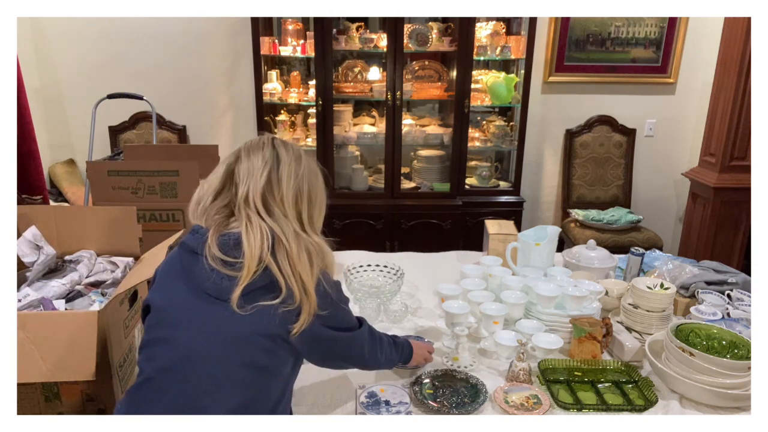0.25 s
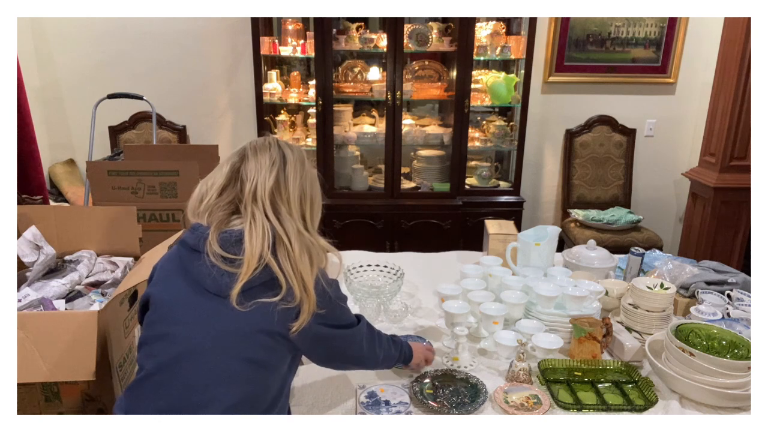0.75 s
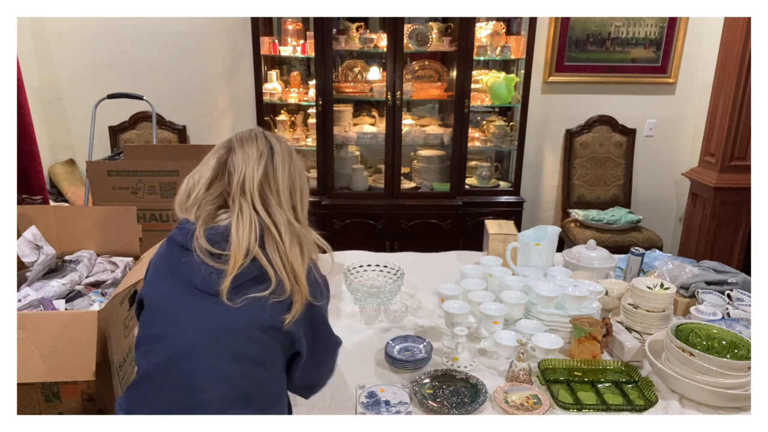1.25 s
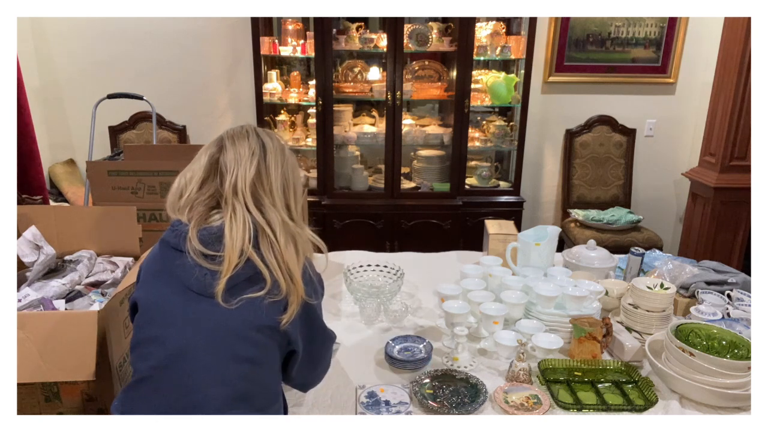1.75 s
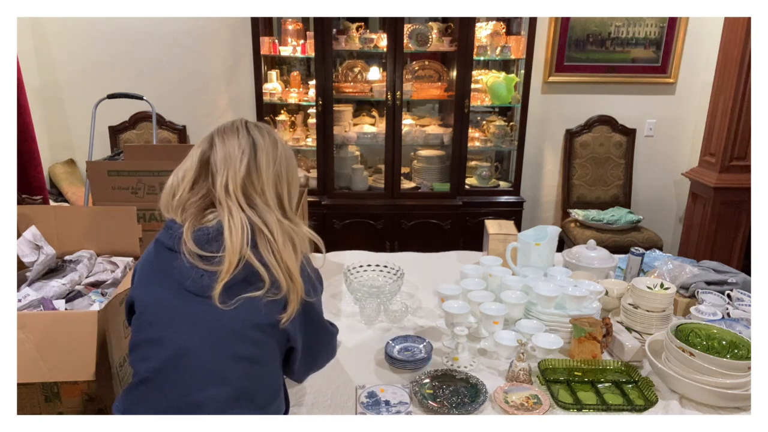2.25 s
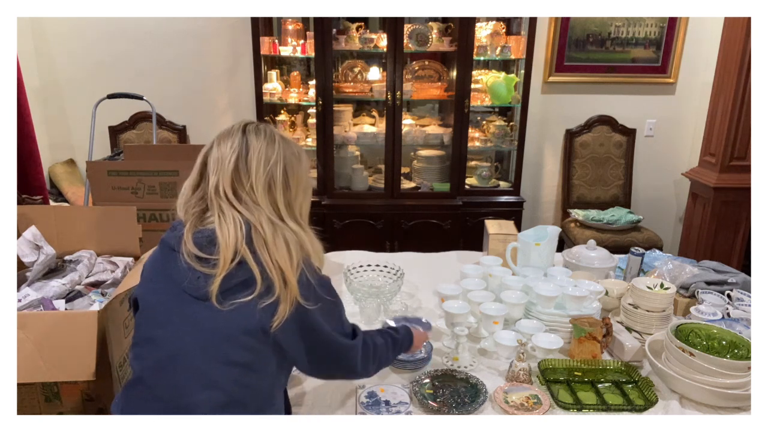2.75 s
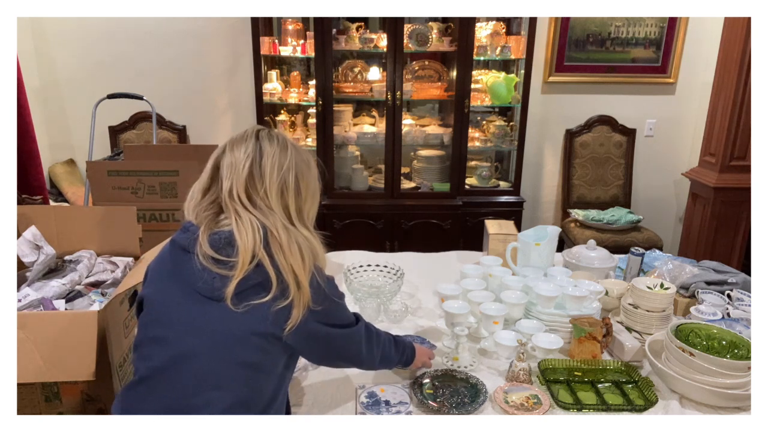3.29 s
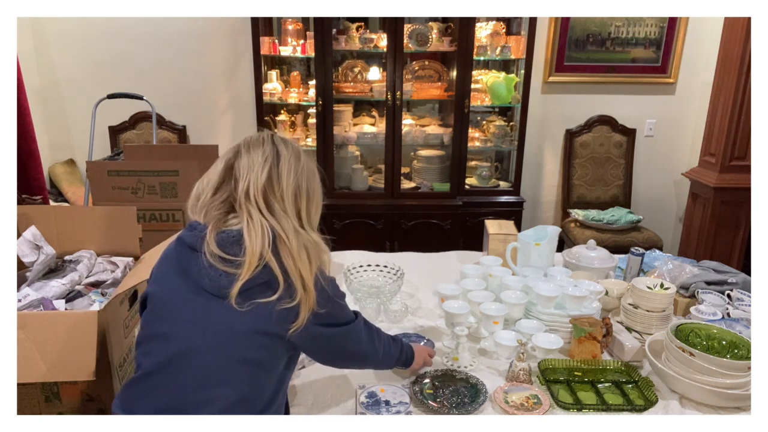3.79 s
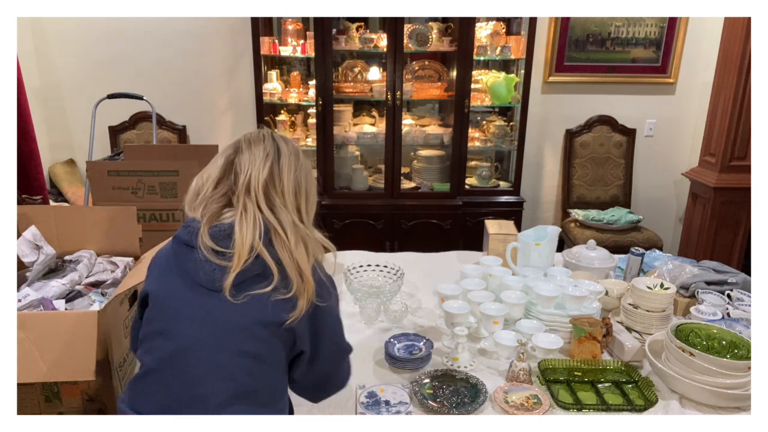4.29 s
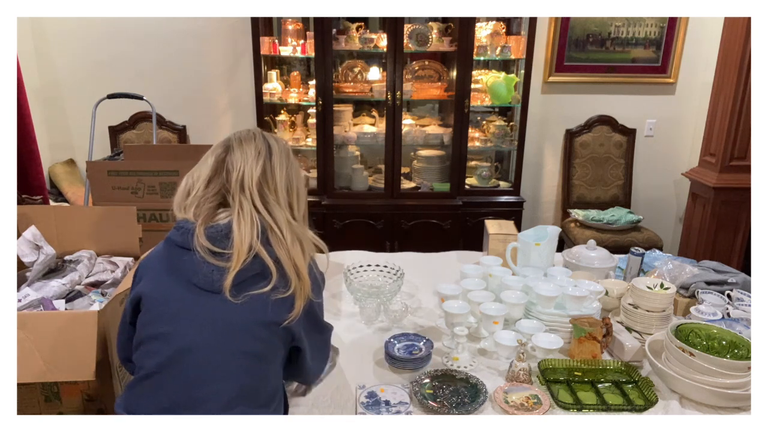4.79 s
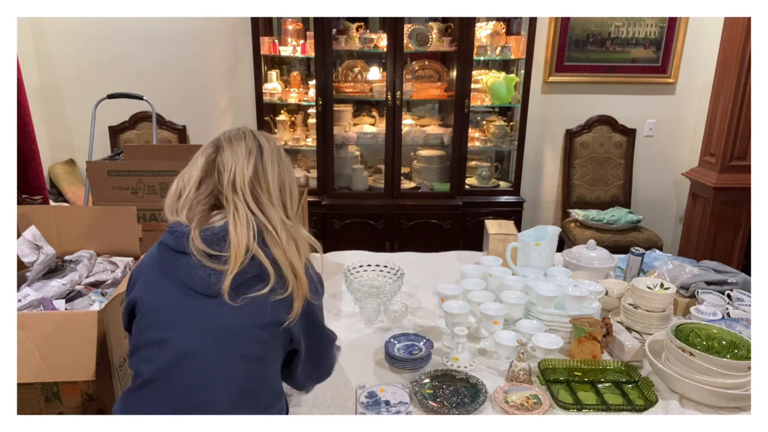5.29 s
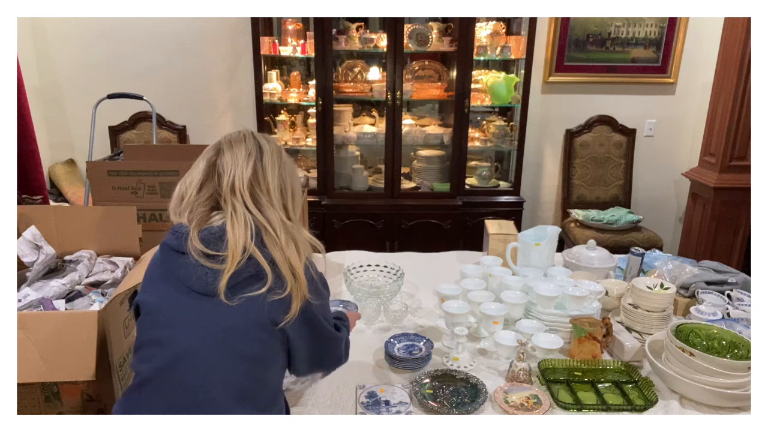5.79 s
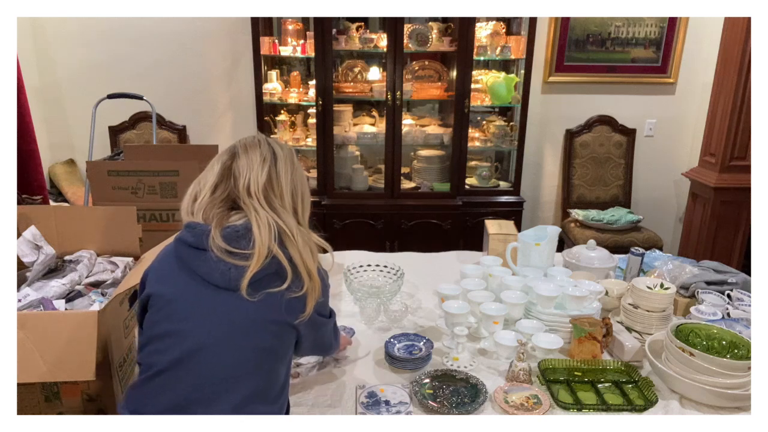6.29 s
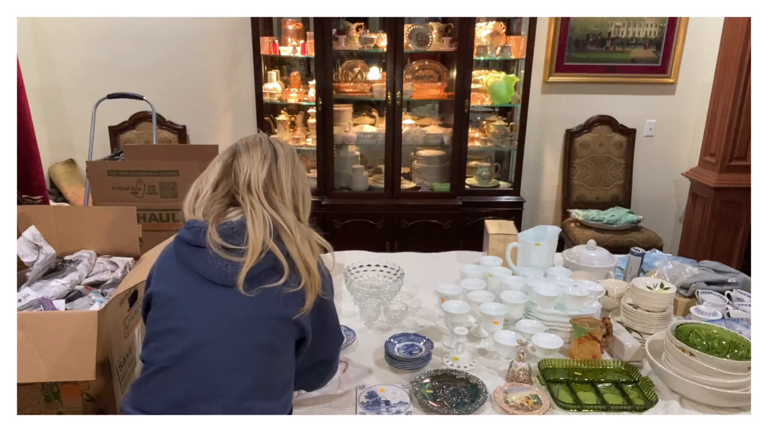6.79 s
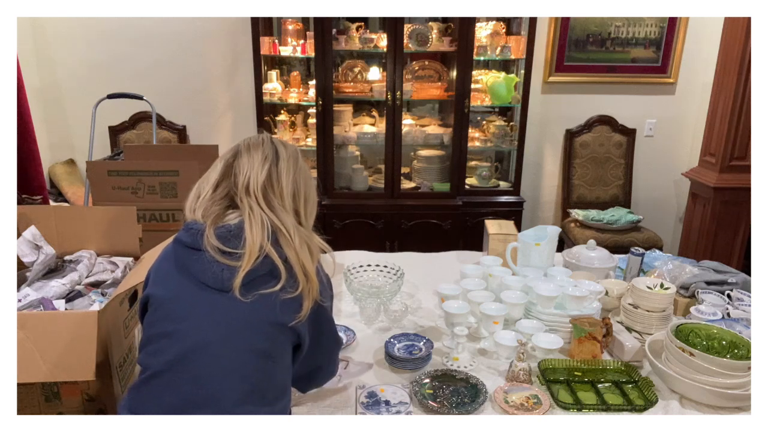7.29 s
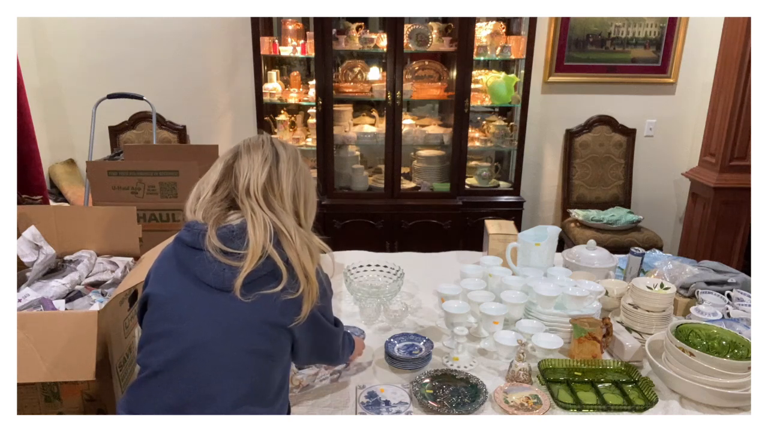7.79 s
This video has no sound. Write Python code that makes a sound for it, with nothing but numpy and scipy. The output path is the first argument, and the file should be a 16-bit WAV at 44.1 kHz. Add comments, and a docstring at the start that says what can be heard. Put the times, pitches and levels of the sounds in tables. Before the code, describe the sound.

A bright, close clatter of china bowls being set into one another opens the scene, followed by dry newspaper crumpling with small snapping folds. The paper quietens, a few softer clinks nudge the stack, then more unwrapping rustle continues. A soft floor thud passes beneath, and bowls knock and drag at the end. Furnished indoor room, stereo microphone a short distance away, faint low rumble and room tone.

```python
"""At a table in a furnished room, newspaper is pulled off china bowls, which knock and chatter as they are stacked.
The paper is a random train of crease clicks shaped by band and handful; sharper folds snap with a brief ring.
The bowls are damped modes struck by blows or fed by dense ticks. A low rumble of resonant noise, perhaps from
outside, fades unevenly; one footfall sounds on the floorboards, over steady room tone that dips once."""
import sys
import numpy as np
from scipy import signal
from scipy.fft import rfft, irfft, next_fast_len
from scipy.io import wavfile
from scipy.ndimage import uniform_filter1d

SR = 44100
rng = np.random.default_rng(int(sys.argv[2]) if len(sys.argv) > 2 else 0)


def unload_audio(sound):
    """Save the sound as a 16-bit wav file, at the path given as the first command line argument."""
    columns = np.transpose(np.atleast_2d(sound))
    # keep every value between -1 and 1, then stretch to whole-number steps
    steps = np.round(np.clip(columns, -1, 1) * 32767)
    wavfile.write(sys.argv[1], SR, steps.astype(np.int16))


N = 355004

# Handfuls of paper crumpled or pulled: (start [s], length [s], relative rustle level [dB],
# treble against it [dB], low thrum against it [dB])
HANDFULS = [(-0.05, 0.078, -55, -9.5, -3), (0.033, 0.44, -42, -11, -9.5), (0.483, 0.059, -44.5, -8, 2.5),
            (0.578, 0.093, -49.5, -2.5, -3), (0.638, 0.18, -44.5, -7, -4), (0.808, 0.055, -36, -6, -0.5),
            (0.92, 0.041, -37.5, -15, -2), (0.96, 0.12, -48.5, 1, -11), (1.142, 0.17, -38, -5.5, -3.5),
            (1.298, 0.31, -44.5, -5.5, -3), (1.5, 0.21, -44, -7, -4), (1.657, 0.04, -46.5, 3.5, 4.5),
            (1.793, 0.23, -53.5, -6, -4.5), (2.022, .06, -52.5, -2, -0.5), (2.191, 0.032, -49.5, -6, -5),
            (2.286, 0.045, -66, -8, -7), (2.483, 0.077, -65, -8, -10), (2.555, 0.052, -65.5, 3.5, -5),
            (2.715, 0.15, -55, -6.5, -1), (2.796, 0.16, -53.5, -6.5, -17), (2.936, 0.14, -48, -4, -5.5),
            (3.065, 0.42, -51, -3.5, -0.5), (3.406, 0.23, -49.5, -7.5, -4), (3.59, 0.1, -46, -8.5, -2.5),
            (3.815, 0.17, -47, -7.5, -3.5), (3.983, 0.091, -48.5, -8, 0), (4.027, 0.21, -47.5, -5.5, -2.5),
            (4.197, 0.12, -40.5, -1.5, -3), (4.255, 0.3, -42.5, -5, -5.5), (4.558, 0.2, -42.5, -4, -4),
            (4.866, 0.39, -50.5, -10, -4.5), (4.938, 0.31, -47.5, -5.5, -4), (5.295, 0.13, -47.5, -4.5, -5),
            (5.478, 0.13, -48, -3.5, -2), (5.595, 0.15, -47, -7.5, -4.5), (5.749, 0.17, -42.5, -2.5, -8.5),
            (5.963, 0.14, -44.5, -10, -4), (6.126, 0.16, -46.5, -2.5, -4.5), (6.3, 0.18, -50.5, -5.5, -3),
            (6.504, 0.09, -47.5, -9, -7), (6.614, 0.19, -43.5, -5, -3.5), (6.756, 0.23, -53, -4, -34),
            (6.92, 0.32, -47.5, -5.5, -4), (7.365, 0.29, -50.5, -8.5, -2.5),
            (7.572, 0.12, -47.5, -4.5, -0.5), (7.65, 0.2, -48, 0.5, -11), (7.8, 0.42, -57, -7, 3)]
# Spectrum of the crease noise: (frequency [Hz], relative level [dB])
PAPER_COLOUR = [(100, -46), (200, -12.5), (500, -3), (900, 15.5), (2200, 12), (4500, 4.5), (8000, 0.5),
                (10000, -5), (12500, -8.5), (15500, -8.5)]
# Modes of the cardboard under the paper: (frequency [Hz], relative level [dB], t60 [s])
PAPER_BOX = [(295, -29, 0.31), (429.3, 15, 0.031), (503, 13, 0.044), (920, -11, 0.12), (1270, 1.5, 0.011)]
GRIP_S, GRIP_SHARE, LET_GO_T60_S = 0.035, 0.13, 0.16   # rise is GRIP_S plus a share of the handful's length
BOX_SWING_DB = 3.5   # standard deviation of each box mode's slow level change


def paper():
    """Crackling noise: creases let go in clumps, and the same impulses excite the box by resonance."""
    start, length, level_db, treble_db, low_db = np.transpose(HANDFULS)
    handfuls = zip(start, length, GRIP_S + GRIP_SHARE * length)
    power = np.array([swell(s, held, rise, LET_GO_T60_S) ** 2 for s, held, rise in handfuls])
    creases = grains(per_s=2500 * from_db(4.0 * wander(SR // 90)), spread_db=1.0)
    creases = creases * rng.standard_normal(N) * from_db(1.43 * wander(SR // 20))

    box = 0
    for hz, db, t60 in PAPER_BOX:
        box = box + from_db(db + BOX_SWING_DB * wander(SR // 30)) * ring(creases, hz, t60)
    sheet = patchy(coloured(creases, PAPER_COLOUR)) + from_db(-16) * rms_one(box)

    def band(edge_hz, kind):
        return rms_one(signal.sosfilt(signal.butter(3, edge_hz, kind, fs=SR, output="sos"), sheet))

    def gain(db):
        return np.sqrt(from_db(2 * db) @ power)   # overlapping handfuls add in power

    middle = gain(level_db) * band([670, 3150], "band")
    low = gain(level_db + low_db) * band(670, "low")
    treble = gain(level_db + treble_db) * band(3150, "high")
    return middle + low + treble


PATCHY_DB = 2.2   # standard deviation of each half-octave band's level


def patchy(x):
    """Band-wise modulation: the buckling sheet favours now one half octave, now another."""
    edges = 200 * 2 ** np.arange(0, 6.6, .5)
    out = 0
    for k, pair in enumerate(zip(edges, edges[1:])):
        band = signal.sosfilt(signal.butter(2, pair, "band", fs=SR, output="sos"), x)
        out = out + (-1) ** k * from_db(PATCHY_DB * wander(SR // 55)) * band
    return out


# Folds that snap: (time [s], relative level of the ring's peak [dB], pitch [Hz])
SNAPS = [(0.505, -26.5, 1074), (0.685, -32.5, 880), (0.813, -33, 840), (0.842, -30, 2550),
         (0.947, -28.5, 510), (1.009, -31, 900), (1.204, -32, 500), (1.261, -26, 1370), (1.53, -38, 860),
         (1.677, -26.5, 2310), (1.699, -27, 2400), (2.067, -37.5, 1730), (2.213, -44, 1080),
         (2.85, -40, 2140), (2.981, -35, 890), (2.995, -33, 2190), (4.171, -31.5, 956), (4.222, -33, 865),
         (4.347, -35, 799), (4.421, -30, 888), (4.538, -31.5, 810), (4.61, -28.5, 1660), (4.641, -32, 1080),
         (5.626, -32.5, 1070), (5.887, -33, 790), (6.002, -37.5, 526), (6.057, -29, 867),
         (6.55, -36.5, 802), (6.636, -35, 766), (6.67, -34.5, 830), (6.716, -31.5, 507),
         (6.802, -36.5, 900), (6.992, -34.5, 1050), (7.109, -35.5, 1370), (7.195, -41, 510),
         (7.236, -41.5, 425), (7.488, -42.5, 550), (7.699, -29.5, 660)]
SNAP_CYCLES = 14.6   # cycles of the pitch for the ring to fall 60 dB
SNAP_T60_S, SNAP_HISS = 0.061, 0.73   # decay of the noise; its gain beside the ring


def snaps():
    """Impulse excitation: each fold is a sharp tick and decaying noise, with a brief ring at its pitch."""
    out, t = np.zeros(N + 2000), np.arange(2000) / SR
    for s, peak_db, hz in SNAPS:
        noise = rng.standard_normal(len(t)) * from_db(-60 * t / SNAP_T60_S)
        burst = noise + 3.8 * (t == 0)
        t60 = SNAP_CYCLES / hz
        tone = ring(burst, hz, t60) - 0.6 * ring(burst, 1.91 * hz, t60 / 2)
        hiss = signal.sosfilt(signal.butter(1, 1.5 * hz, fs=SR, output="sos"), noise)
        snap = tone / np.abs(tone).max() + SNAP_HISS * hiss
        out[round(s * SR):][:2000] += from_db(peak_db) * snap
    return out[:N]


# A bowl set into another, one list per seating:
# (time [s], relative blow level [dB], hardness [dB per octave], favoured frequency [Hz])
NESTED = [
    [(0.0775, -36.5, -0.5, 1490), (0.1015, -8, 2, 1640), (0.1035, -20, -2, 2830), (0.1165, -10.5, -4, 4030),
     (0.1266, -13.5, -1.5, 5970), (0.145, -21.5, -1, 4030), (0.153, -20, 0, 5970), (0.1885, -19, -2, 1520),
     (0.197, -25, -6, 2500)],
    [(0.2782, -11, -2.5, 1900), (0.2855, -35, 9, 4020)],
    [(0.3308, -16, 0, 1760), (0.3375, -23, -16, 1640), (0.3555, -27, 6, 5570), (0.365, -33, 3, 1475)],
]
# Modes of the nested bowls: (frequency [Hz], relative level [dB], t60 [s])
NESTED_MODES = [(1050, -31.5, .08), (1350, -19.5, 0.12), (1475, -5.5, 0.078), (1550, -10.5, 0.11),
                (1640, -5, 0.05), (1900, -14.5, 0.042), (2304, -14.5, 0.34), (2385, -11, 0.26),
                (2546, -9.5, 0.21), (2600, -13, .12), (2830, -4, 0.14), (3106, -9, 0.1), (3531, -23, 0.1),
                (3950, -11, 0.13), (4030, -6, 0.15), (4170, -3, 0.058), (4600, -5, 0.043),
                (5860, -11.5, 0.09), (5970, -2.5, 0.13), (5970, -11, 0.09), (6650, -16, 0.091),
                (6610, -17, 0.21), (6770, -14.5, 0.12), (7560, -13.5, 0.11), (8670, -2.5, 0.04),
                (11160, -15, 0.16), (13300, -24, 0.071)]
CHOKE_T60_S = .015   # reseating the bowl stills what was ringing


def nested():
    """Contact damping: the bowl settles in stages, each new seating choking the ring of the one before."""
    out, ends_s = 0, [stage[0][0] for stage in NESTED[1:]] + [N / SR]
    for stage, end_s in zip(NESTED, ends_s):
        ringing = knocks(stage, NESTED_MODES, clatter_db=13.5, chatter_db=-0.5, favour_db=12.0)
        out = out + ringing * swell(-1, end_s + 1, 1, CHOKE_T60_S)
    return out


# The stack nudged into place:
# (time [s], relative blow level [dB], hardness [dB per octave], favoured frequency [Hz])
NUDGED = [(3.149, -26.5, 1.5, 1500), (3.163, -30, 2, 1480), (3.180, -25, -8, 1550), (3.19, -25, -4, 2450),
          (3.2002, -29, -16, 1690), (3.212, -31.5, -10.5, 1050), (3.226, -41, -7, 2400),
          (3.3109, -14, -4, 1740), (3.3165, -26, 11.5, 1710), (3.3345, -27, 6, 1720),
          (3.3537, -25, 7, 1700), (3.359, -21, -10, 3950), (3.3686, -28, 7.5, 2890),
          (3.6085, -26.5, -2, 1530), (3.6267, -20.5, -1.5, 2630), (3.6779, -24, 3.5, 1527),
          (3.69, -33, 7, 2700), (3.8849, -17.5, 3, 1400), (3.8862, -30, 6.5, 7950),
          (3.8926, -24, 7.5, 2370)]
# Modes of the nudged stack: (frequency [Hz], relative level [dB], t60 [s])
NUDGED_MODES = [(1036, -13.5, 0.05), (1370, -5.5, 0.055), (1463, -5, 0.062), (1644, -1, 0.054),
                (1740, -6.5, 0.06), (2360, -6, 0.058), (2516, -5.5, 0.033), (2750, -13, 0.06),
                (2940, -12, 0.043), (3200, -3.5, 0.044), (3950, -15, 0.037), (4540, -5.5, 0.016),
                (6200, -16, 0.027), (6970, -20, 0.043), (7950, -17, 0.015), (11500, -24, 0.015)]


def nudged():
    """Modal excitation by impact: small blows set the damped modes of the stack ringing."""
    return knocks(NUDGED, NUDGED_MODES, clatter_db=9.0, chatter_db=-4.0, favour_db=13.5)


# A bowl dragged out of another in two pulls: (start [s], length [s], relative level of the ticks [dB])
PULLS = [(7.82, 0.059, -55), (7.93, 0.048, -65)]
# Modes of the dragged bowls: (frequency [Hz], relative level [dB], t60 [s])
DRAGGED_MODES = [(900, -16, 0.1), (1117, -11.5, 0.11), (1270, -9.5, 0.025), (1380, 0, 0.095),
                 (1573, -3, 0.064), (1733, -10.5, 0.05), (2270, -12.5, 0.14), (2350, -1.5, 0.14),
                 (2460, -1, 0.078), (3066, -1.5, 0.06), (3510, -8.5, 0.078), (3830, -22, 0.024),
                 (3760, 0.5, 0.057), (4800, -8, 0.083), (4870, -4.5, 0.039), (5950, -8, 0.07),
                 (6550, -8, 0.061), (5770, -17, 0.088), (6240, -15, 0.06), (5650, -21, 0.046),
                 (2650, -18, 0.05), (13100, -28, 0.036), (8550, -6, 0.033), (11200, -20, 0.03)]
PULL_RISE_S, PULL_T60_S = 0.015, 0.078


def dragged():
    """Chattering contact: dense uneven ticks, rim on rim, feed modes that the moving contact favours in turn."""
    start = round(PULLS[0][0] * SR)
    pull = sum(from_db(db) * swell(s, length, PULL_RISE_S, PULL_T60_S) for s, length, db in PULLS)
    ticks = (grains(per_s=960, spread_db=-2.5) * pull)[start:]

    def contact(k, hz):
        return ticks * from_db(3.5 * wander(SR // 60, len(ticks)))
    return np.pad(stacked_china(contact, DRAGGED_MODES, clatter_db=12.0), (start, 0))


# The dragged bowl catches on the rim:
# (time [s], relative blow level [dB], hardness [dB per octave], favoured frequency [Hz])
CAUGHT = [(7.8035, -19.5, -4.5, 2300), (7.8138, -21, -1, 2340), (7.8326, -8.5, -6, 1475),
          (7.841, -19, -2, 2350), (7.853, -13.5, 0, 6430), (7.862, -16.5, -0.5, 3720),
          (7.870, -29, 6.5, 1380), (7.879, -27, 6, 6340), (7.892, -26, 4, 3720), (7.906, -25, 0, 3720),
          (7.922, -26.5, 0, 3700), (7.946, -16, -6, 1180), (7.9561, -19, -7, 2360), (7.968, -12, -3, 1270),
          (7.978, -18, -3, 5930), (7.981, -20.5, -0.5, 1380), (7.989, -27, 1, 1195), (8.003, -26, 2, 3380)]


def caught():
    """Modal excitation by impact: catches on the rim strike the modes of the dragged bowls."""
    return knocks(CAUGHT, DRAGGED_MODES, clatter_db=8.0, chatter_db=3.0, favour_db=11.0)


SHARE_DB = -20.5   # each mode takes only a share of a blow
RING_OUT = SR * 3 // 4   # samples kept after the last blow


def knocks(blows, modes, clatter_db, chatter_db, favour_db):
    """Selective excitation: a blow is a click and rim chatter; its place and hardness pick the modes it favours."""
    s, peak_db, hardness_db, favoured_hz = np.transpose(blows)
    at = np.round(s * SR).astype(int)
    luck = rng.standard_normal((len(blows), len(modes)))
    start, end = at.min(), min(at.max() + RING_OUT, N)

    def strike(k, hz):
        near = np.exp(-(np.log2(hz / favoured_hz) / 0.093) ** 2)
        tilt_db = hardness_db * np.log2(hz / 2000)
        clicks = np.zeros(end - start)
        clicks[at - start] = from_db(peak_db + SHARE_DB + tilt_db + favour_db * near + 2.0 * luck[:, k])
        return clicks + from_db(chatter_db) * smear(clicks, t60=0.099)
    return np.pad(stacked_china(strike, modes, clatter_db), (start, N - end))


RATTLE_DB = 2.5   # loose contact makes each ring flutter: standard deviation


def stacked_china(strike, modes, clatter_db):
    """Mode splitting and damping by contact: each mode is a fluttering pair over a clatter of the same colour."""
    out = 0
    for k, (hz, level_db, t60) in enumerate(modes):
        force = from_db(level_db) * strike(k, hz)
        twin_hz = hz * (1 + 0.012 * (-1) ** k)
        pair = ring(force, hz, t60) - 0.71 * ring(force, twin_hz, 0.64 * t60)
        flutter = from_db(RATTLE_DB * wander(SR // 200, len(pair)) - RATTLE_DB / 2)
        clatter = from_db(clatter_db) * ring(force, hz, 20.0 / hz) * (-1) ** k   # falls 60 dB in 20 cycles
        out = out + pair * flutter + clatter
    return signal.sosfilt(signal.butter(2, 800, "high", fs=SR, output="sos"), out)


# A heel, then the weight rolling onto the floor: (time [s], relative level [dB])
THUD = [(6.467, -39.5), (6.491, -37), (6.55, -39.5)]
# Modes of the floorboards: (frequency [Hz], relative level [dB], t60 [s])
FLOOR_MODES = [(64, -14, 0.72), (92, -2.5, 0.32), (143, -12, 0.23)]


def footfall():
    """Low-passed impact: a soft sole rounds the blow before it excites the floor modes."""
    steps = np.zeros(N)
    for s, peak_db in THUD:
        steps[round(s * SR)] = from_db(peak_db)
    steps = signal.sosfilt(signal.butter(2, 250, fs=SR, output="sos"), steps)
    return sum(from_db(db) * ring(steps, hz, t60) for hz, db, t60 in FLOOR_MODES)


# Course of the low rumble: (time [s], level [dB])
RUMBLE = [(0.0, -47), (1.4, -47), (2.25, -50), (2.5, -46), (4.2, -50.5), (4.7, -48), (5.4, -54.5),
          (5.65, -47), (5.9, -60.5), (6.5, -61), (6.85, -65.5), (7.4, -70.5), (8.05, -60.5)]
# Its resonances: (frequency [Hz], width [Hz], relative level [dB])
RUMBLE_PEAKS = [(41.8, 12, -21), (60.6, 17, -7.5), (92.6, 19.6, 1.5), (151.4, 36, -13)]


def rumble():
    """Resonant filtering: stereo noise passes a few low resonances and follows a level curve."""
    low = 0
    for hz, width_hz, db in RUMBLE_PEAKS:
        edges = [hz - width_hz / 2, hz + width_hz / 2]
        white = rng.standard_normal((2, N))
        band = signal.sosfilt(signal.butter(2, edges, "band", fs=SR, output="sos"), white)
        low = low + from_db(db) * rms_one(band)
    return from_db(in_time(RUMBLE)[0]) * rms_one(low)


# Spectrum of the room tone: (frequency [Hz], relative level [dB per Hz])
AIR = [(30, -35), (60, -8.5), (120, -23), (300, -12.5), (600, -25), (2000, -39), (8000, -40), (15500, -50)]
AIR_DB = -58.5


def room_tone():
    """Stationary broadband noise: two independent channels share one spectrum."""
    return from_db(AIR_DB) * coloured(rng.standard_normal((2, N)), AIR)


# Reverberation time before each source's share: (frequency [Hz], t60 [s])
ROOM_T60 = [(200, 1), (1500, 0.75), (10000, 0.69)]


def room(x, wet_db, t60_share):
    """Reverberation: direct sound, then two unrelated tails of reflections that decay by band."""
    t = np.arange(SR // 2) / SR
    tail, edges = 0, 100 * 2 ** np.arange(0, 8.1, 1)
    for low, high in zip(edges, np.minimum(edges[1:], .48 * SR)):
        noise = rng.standard_normal((2, len(t)))
        band = signal.sosfilt(signal.butter(1, [low, high], "band", fs=SR, output="sos"), noise)
        t60 = t60_share * at_hz(ROOM_T60, np.sqrt(low * high))
        tail = tail + band * from_db(-60 * t / t60)
    tail *= np.clip((t - .003) / 0.0017, 0, 1)   # first reflections arrive after a few ms
    tail /= np.sqrt(np.sum(tail ** 2, axis=1, keepdims=True))
    return x + from_db(wet_db) * signal.fftconvolve(x[None], tail, axes=1)[:, :N]


def ring(clicks, hz, t60):
    """Damped oscillator: a unit click sets a sine of height 1 ringing."""
    r, w = from_db(-60 / (t60 * SR)), 2 * np.pi * hz / SR
    return signal.lfilter([0, np.sin(w)], [1, -2 * r * np.cos(w), r * r], clicks + 1e-18)


def grains(per_s, spread_db):
    """Random point process: clicks at chance moments, their dB sizes exponentially spread; unit rms."""
    sizes = from_db(spread_db * np.minimum(rng.exponential(1, N), 5)) * rng.choice([-1, 1], N)
    return rms_one(sizes * (rng.random(N) < per_s / SR))


def smear(x, t60):
    """Energy spreading: every click becomes a fresh burst of dying noise with the click's energy."""
    r = from_db(-60 / (t60 * SR))
    envelope = signal.lfilter([1], [1, -r], x + 1e-18)
    return np.sqrt(1 - r * r) * envelope * rng.standard_normal(len(x))


def swell(start, length, rise, t60):
    """Attack and exponential decay: a gain rises, holds until start + length and dies away."""
    t = np.arange(N) / SR - start
    attack = np.sin(np.pi / 2 * np.clip(t / rise, 0, 1)) ** 2
    return attack * from_db(-60 * np.maximum(t - length, 0) / t60)


def wander(span, length=N):
    """Slow random modulation: noise averaged twice over span samples; unit rms."""
    once = uniform_filter1d(rng.standard_normal(length), span)
    return rms_one(uniform_filter1d(once, span))


def coloured(x, spectrum):
    """Spectral shaping: weight each frequency by a spectrum; unit rms."""
    size = next_fast_len(N)
    gain = from_db(at_hz(spectrum, np.fft.rfftfreq(size, 1 / SR)))
    return rms_one(irfft(rfft(x, size) * gain, size)[..., :N])


def at_hz(points, hz):
    """Logarithmic frequency scale: read a spectrum between its points."""
    points_hz, values = np.transpose(points)
    return np.interp(np.log(hz + 1), np.log(points_hz), values)


def in_time(rows):
    """Linear interpolation: columns of a curve, one value per sample."""
    s, *columns = np.transpose(rows)
    return [np.interp(np.arange(N) / SR, s, c) for c in columns]


def from_db(db):
    """Level to amplitude: decibels to gain."""
    return 10 ** (np.asarray(db) / 20)


def rms_one(x):
    """Power normalisation: scale to unit rms."""
    return x / np.sqrt(np.mean(x ** 2) + 1e-20)


DIP_S, DIP_WIDTH_S, DIP_DB = 2.7, .035, -9   # rustle and room tone dip briefly


def scene():
    """Direct-to-reverberant balance: the china's room tail is quieter and shorter than the paper's."""
    china = nested() + nudged() + caught() + dragged()
    china = room(china, wet_db=-4.5, t60_share=.55) * from_db([[-.8], [.8]])
    rustle = room(paper(), wet_db=2.0, t60_share=1) + room(snaps(), wet_db=0.0, t60_share=0.72)
    rustle = from_db([[-4.3], [-3.7]]) * rustle
    dip = from_db(DIP_DB * np.exp(-((np.arange(N) / SR - DIP_S) / DIP_WIDTH_S) ** 2))
    return china + dip * (rustle + room_tone()) + rumble() + footfall()


# Left-right blend: (frequency [Hz], share in common [0 to 1])
LIKENESS = [(25, .85), (80, .97), (290, 0.62), (640, 0.06), (3000, 0.11), (6500, 0.31), (8500, 0.93),
            (15000, .95)]
# Phase between the channels: (frequency [Hz], left minus right [rad])
PHASE = [(0, 0), (340, 0), (950, .8), (2150, .6), (5340, 1.5), (7400, 0), (8300, -.8), (9400, -3.0),
         (10800, -3.25), (11900, -6.1), (14000, -6.4), (14800, -9.3), (15600, -9.5)]
CUTOFF_HZ = 15600


def record(dry):
    """Interchannel coherence: lows and highs are alike, the middle is wide, highs differ in phase; the top is cut."""
    size = next_fast_len(N + 2000)
    hz = np.fft.rfftfreq(size, 1 / SR)
    left, right = rfft(dry, size)
    alike = np.clip(at_hz(LIKENESS, hz), 0, 1)
    common = np.sqrt(1 + alike) * (left + right) / 2
    apart = np.sqrt(1 - alike) * (left - right) / 2
    turn = np.exp(.5j * np.interp(hz, *np.transpose(PHASE)))   # half the phase on each side
    pair = irfft([(common + apart) * turn, (common - apart) / turn], size)[:, :N]
    return signal.sosfilt(signal.ellip(10, .5, 80, CUTOFF_HZ, fs=SR, output="sos"), pair)


dry = scene()
out = record(dry)
unload_audio(out)
```